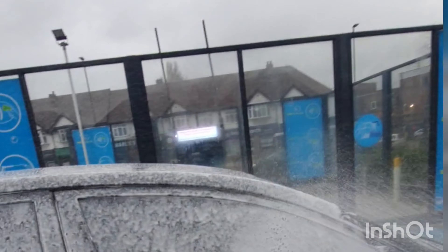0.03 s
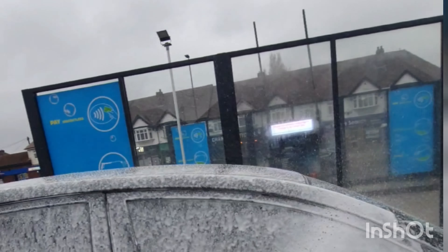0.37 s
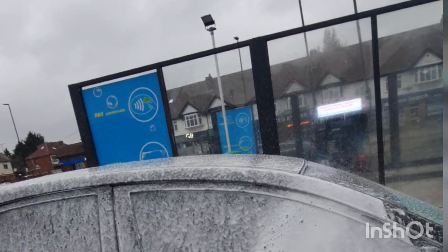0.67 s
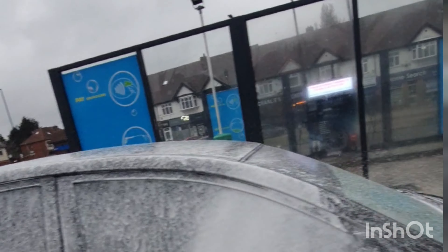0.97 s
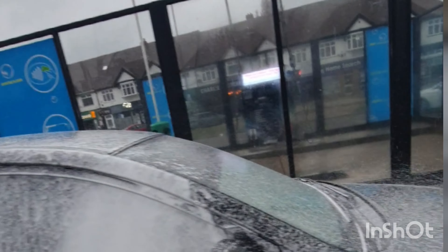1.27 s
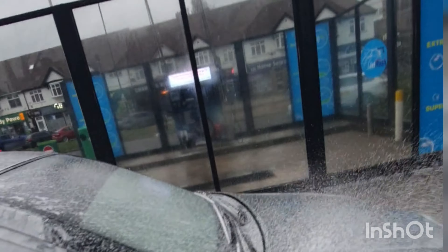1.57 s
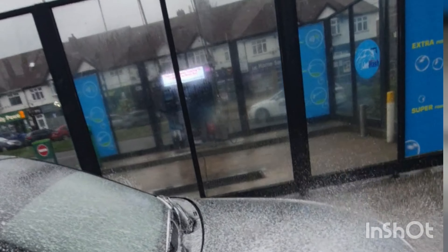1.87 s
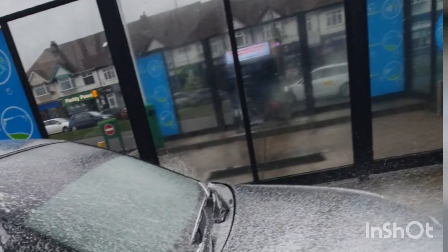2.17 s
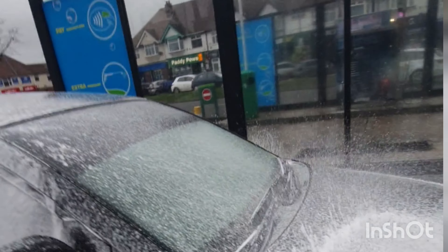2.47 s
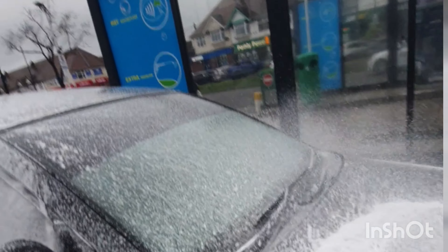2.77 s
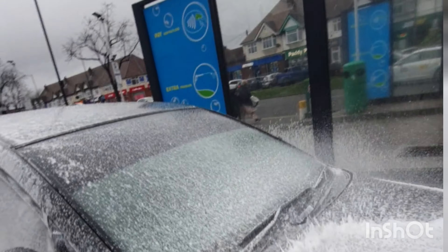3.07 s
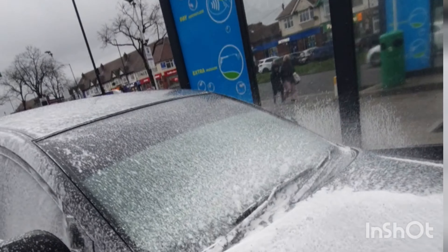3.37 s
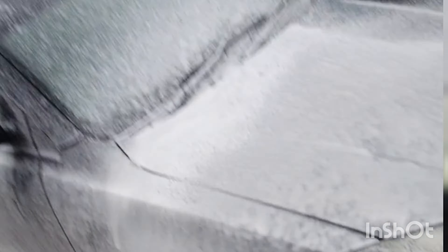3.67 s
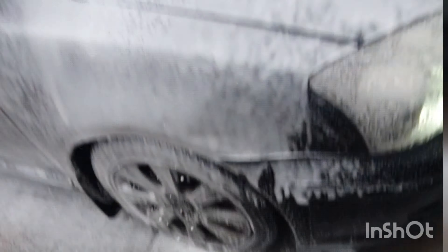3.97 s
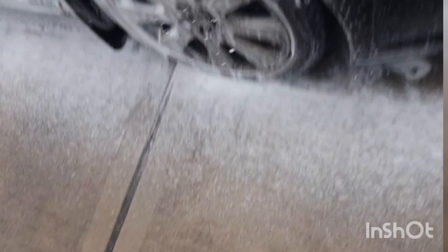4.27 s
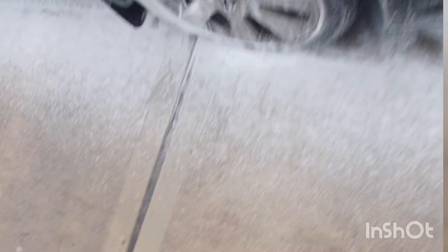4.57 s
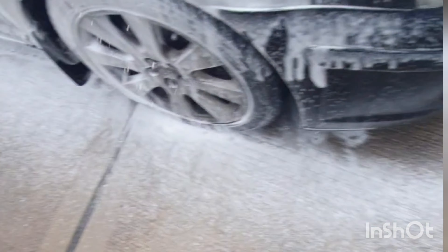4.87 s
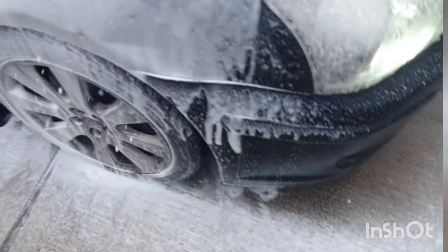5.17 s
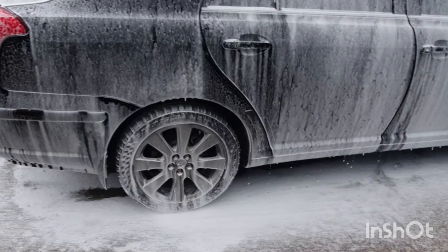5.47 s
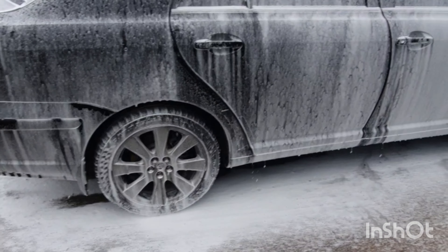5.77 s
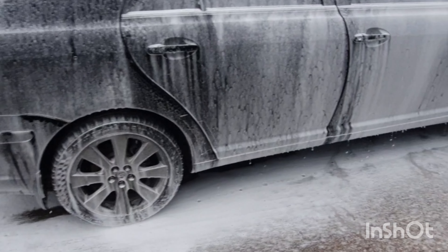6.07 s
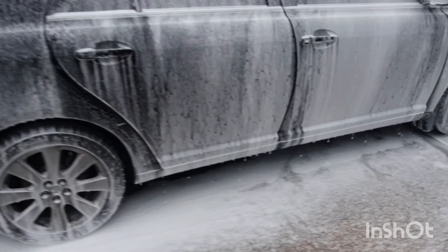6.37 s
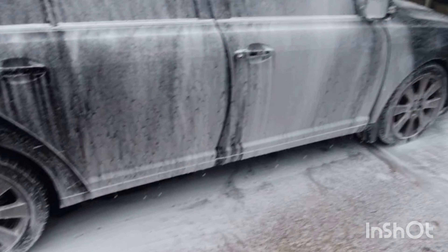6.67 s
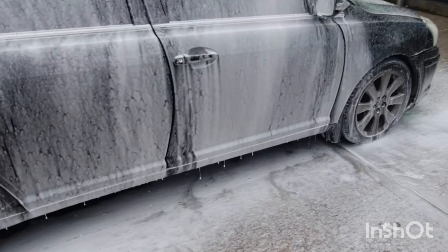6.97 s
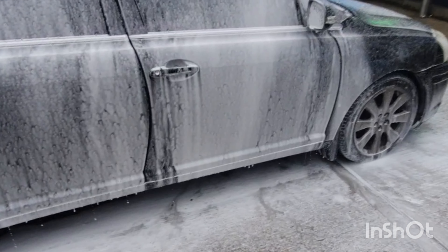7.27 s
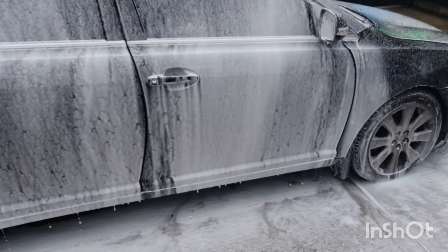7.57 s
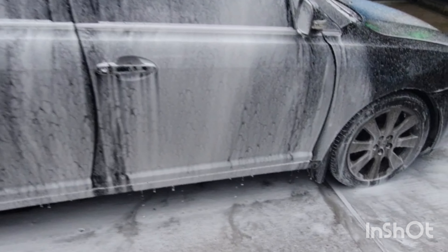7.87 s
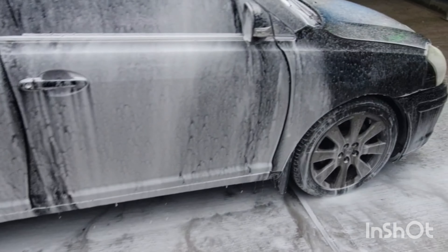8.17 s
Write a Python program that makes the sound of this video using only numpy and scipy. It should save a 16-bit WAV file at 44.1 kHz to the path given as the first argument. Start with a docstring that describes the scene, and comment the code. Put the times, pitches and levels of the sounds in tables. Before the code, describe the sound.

A close jet of spray hisses over a car's panels in an open wash bay while a pump hums. It swings left, buffets the microphone with wind and dull pops, and stops about halfway through. Quiet bubbling and dripping follow, with a ticking idle and a faint wavering whistle. Then street rumble and wet tyre noise grow, a car goes by, and a sharp drip lands.

```python
"""An outdoor car wash bay: a pressure lance sprays a car with hissing drops while its pump hums. The jet swings
to the left, its draught and drops hit the two microphones, and the trigger is let go. Now one hears bubbles
ringing in trickling foam, drips, the ticking of the idling car and a thin whistle. The sound dips for an
instant as the scene changes from the front wheel to the car's side. There, engines and tyres on a wet road grow
louder, and one car passes."""
import sys
import numpy as np
from scipy import signal
from scipy.fft import rfft, irfft, next_fast_len
from scipy.io import wavfile
from scipy.ndimage import map_coordinates

SR = 44100
rng = np.random.default_rng(int(sys.argv[2]) if len(sys.argv) > 2 else 0)


def generate_wav(sig):
    """Save sig (samples, or channels by samples) to the path in sys.argv[1] as 16-bit PCM at SR."""
    pcm = np.round(np.clip(np.atleast_2d(sig).T, -1, 1) * 32767).astype(np.int16)
    wavfile.write(sys.argv[1], SR, pcm)


N = 371322
TIME = np.arange(N) / SR
SIZE = next_fast_len(N, real=True)
HZ = np.maximum(np.arange(SIZE // 2 + 1) * SR / SIZE, 1)
RELEASE_S, JUMP_S = 3.95, 5.3857   # the trigger is let go; the scene changes from the wheel to the car's side


def from_db(db):
    """Turn decibels into a gain, a number to multiply a sound by."""
    return 10 ** (np.asarray(db) / 20)


def pan(db):
    """Gains for two ears that make the left one db louder than the right."""
    return from_db(db * np.array([[.5], [-.5]]))


def rms_one(x):
    """Scale a sound so that its average strength (rms) is 1."""
    return x / np.sqrt(np.mean(x ** 2) + 1e-20)


def in_time(rows):
    """Join a table's points in time, giving each column a value at every sample."""
    s, *columns = np.transpose(rows)
    return np.array([np.interp(TIME, s, c) for c in columns])


def in_hz(rows):
    """Join a table's points in frequency, giving each column a value at every frequency."""
    hz, *columns = np.transpose(rows)
    return np.array([np.interp(np.log(HZ), np.log(hz), c) for c in columns])


def colour(x, gain):
    """Filter a sound: give each frequency its own gain."""
    return irfft(rfft(x, SIZE) * gain, SIZE)[..., :N]


def below(edge_hz, order=4):
    """Gains that keep what is below the edge."""
    return 1 / np.sqrt(1 + (HZ / edge_hz) ** (2 * order))


def above(edge_hz, order=4):
    """Gains that keep what is above the edge."""
    return 1 / np.sqrt(1 + (edge_hz / HZ) ** (2 * order))


def bell(x, centre, width):
    """A rounded bump of height 1."""
    return np.exp(-((x - centre) / width) ** 2)


def ramp(start_s, length_s):
    """An even rise from 0 to 1."""
    return np.clip((TIME - start_s) / length_s, 0, 1)


def after_release(t60):
    """A gain of 1 that falls 60 dB every t60 seconds once the trigger is let go."""
    return from_db(-60 * np.clip((TIME - RELEASE_S) / t60, 0, 3))


def drift(rate_hz, step=40):
    """A slow random wobble, typically 1 in size."""
    count = N // step + 2
    hz = np.arange(count // 2 + 1) * SR / step / count
    slow = irfft(rfft(rng.standard_normal(count)) / np.sqrt(1 + (hz / rate_hz) ** 4), count)
    return np.interp(np.arange(N) / step, np.arange(count), rms_one(slow))


def stereo_noise(gain, likeness):
    """Filtered noise; likeness (0-1) is how much of it both ears share."""
    common = colour(rng.standard_normal(N), gain * np.sqrt(likeness))
    return common + colour(rng.standard_normal((2, N)), gain * np.sqrt(1 - likeness))


def delayed(x, delay_ms, oversample=3):
    """Shift a sound later by a tiny, changing time."""
    fine = signal.resample_poly(x, oversample, 1)
    return map_coordinates(fine, [(TIME - delay_ms / 1000) * SR * oversample], order=1)


def impacts(per_s, spread_db, share):
    """Many tiny hits of uneven size in a smooth rush; share (0-1) is their part of the power."""
    sizes = from_db(spread_db * np.minimum(rng.exponential(1, N), 4)) * rng.choice([-1, 1], N)
    hits = rms_one(sizes * (rng.random(N) < per_s / SR))
    return np.sqrt(share) * hits + np.sqrt(1 - share) * rng.standard_normal(N)


def bodywork_echoes(x, count=2, gain=.16, wander_ms=.05):
    """Weak echoes off the curved car ripple the hiss; their paths wander as the lance moves."""
    paths_ms = (ms + wander_ms * drift(2.7) for ms in rng.uniform(0.673, 2.4, count))
    return x + gain * sum(np.interp(TIME - ms / 1000, TIME, x) for ms in paths_ms)


def close_echo(x, path, gain):
    """An echo off a surface near the microphone, with a gliding delay, turns the hiss into a swish."""
    echo_ms, = in_time(path)
    return x + gain * delayed(colour(x, above(4680, order=2)), echo_ms, oversample=2)


def jet(level_db=-0.88, mist_db=-8, flutter_db=0.53, sway_db=0.51, ahead_db=2.5, db_per_ms=-15):
    """The spray's hiss reaches one ear first; its scatter off car and screens comes from all round."""
    # how hard the jet hits the panels: (time [s], level [dB])
    force = [(0, 3), (.32, 1.4), (.6, 1.5), (.9, -0.53), (1.7, 1), (2.15, 0.36), (2.83, -0.6), (3.02, 0.44),
             (3.4, 1), (3.9, -0.5)]
    # direction of the jet: (time [s], lag of the left ear behind the right [ms])
    bearing = [(.09, 0.033), (.23, 0.17), (.4, 0.19), (.6, 0.26), (.83, .23), (1.2, .225), (1.4, .175),
               (1.6, 0.21), (1.79, 0.26), (2.13, .22), (2.3, .13), (2.55, 0.12), (2.8, 0.028), (3, 0.14),
               (3.2, 0.17), (3.38, .025), (3.58, 0.039), (3.72, -0.12), (3.82, -0.23), (3.92, -.28)]
    # tone of the hiss: (frequency [Hz], left level [dB], right level [dB])
    hiss = [(172.5, -92, -62), (315, -63.5, -59.5), (557, -73, -66), (1200, -67.5, -64), (1430, -62.5, -60),
            (2030, -63.5, -63), (2770, -57, -61), (3620, -55.5, -52.5), (4230, -53.5, -56),
            (6200, -54, -53), (8780, -56, -51.5), (10500, -61, -58), (14000, -63, -54.5),
            (15380, -61.5, -58)]
    # hiss that comes straight from the jet: (frequency [Hz], share [0-1])
    direct_share = [(150, .4), (600, .52), (1500, .6), (2250, .96), (3400, 1), (5200, .7), (7300, .46),
                    (9300, .27), (14000, .45)]
    # middle of the hiss, under its bright top: (time [s], left boost [dB], right boost [dB])
    middle_boost = [(0, -1.5, 1), (.55, -2.5, 1.9), (1, -1.5, -0.5), (1.55, -3.5, -1), (2.15, -1.5, 0.5),
                    (2.5, -3, 0.6), (2.8, .5, 0.5), (3.1, 1, 1.5), (3.4, -0.3, 1.5), (3.72, 2, 4),
                    (3.92, 0.5, 3.5)]
    # echoes off surfaces near each microphone: (time [s], delay [ms])
    left_echo = [(0, .75), (.56, .7), (.67, .55), (1.23, .51), (1.93, .5), (2.16, .66), (2.62, .71),
                 (2.72, .61), (3.18, .57), (3.44, .67), (3.67, .55)]
    right_echo = [(0, .43), (.2, .53), (.55, .5), (1.37, .37), (1.7, .38), (2.04, .44), (2.46, .455),
                  (2.7, .5), (3.15, .75), (3.4, .62), (3.8, .47)]
    force_db, = in_time(force)
    lag_ms, = in_time(bearing)
    source, *around = (bodywork_echoes(impacts(14000, spread_db=3, share=0.33)) for _ in range(3))
    share = in_hz(direct_share)
    tone = from_db(in_hz(hiss)) * np.sqrt(SR / 2)
    ears = np.array([delayed(source, lag_ms / 2), delayed(source, -lag_ms / 2)])
    direct = colour(ears, tone * np.sqrt(share))
    scatter = colour(np.array(around), tone * np.sqrt(1 - share))
    # the valve shuts quickly; water still in the air lands a little later
    valve = after_release(t60=0.053)
    mist = from_db(mist_db) * after_release(t60=0.222)
    spray = direct * valve + scatter * np.maximum(valve, mist)
    middle = colour(spray, below(4500) * above(706.5, order=2))
    spray = colour(spray, above(50)) + middle * (from_db(in_time(middle_boost)) - 1)
    left = close_echo(spray[0], left_echo, gain=.15)
    right = close_echo(spray[1], right_echo, gain=.27)
    gain = from_db(level_db + force_db + flutter_db * drift(26) + sway_db * drift(5))
    return np.array([left, hollow(right)]) * pan(ahead_db + db_per_ms * lag_ms) * gain


def hollow(x, wander_hz=60, width_hz=400, third_width_hz=650):
    """Air in a hollow rings at one pitch and at three times that pitch; both rise as it narrows."""
    # a hollow, probably a hand, by the right microphone: (time [s], pitch [Hz], boost [dB])
    resonance = [(2.04, 3670, -1), (2.24, 3570, 5), (2.8, 3920, 5.5), (3.3, 3950, 4), (3.68, 4320, 5),
                 (3.83, 6050, 4.5)]
    hz, s, frames = signal.stft(x, SR, nperseg=512)
    pitch, boost_db = in_time(resonance)
    centre = np.interp(s, TIME, pitch + wander_hz * drift(2.5))
    lift = bell(hz[:, None], centre, width_hz) + bell(hz[:, None], 3 * centre, third_width_hz)
    boosted = frames * from_db(np.interp(s, TIME, boost_db) * lift)
    return signal.istft(boosted, SR, nperseg=512)[1][:N]


def pump(loaded_hz=72.85, idle_hz=76.5, hum_db=-38, waver_db=.9, idle_drop_db=13.5, rumble_db=-45):
    """Piston strokes hum and whine through the hose; freed of the jet, they run faster and quieter."""
    # tones of the hum: (multiple of the stroke rate, relative level [dB])
    hum_tones = [(1, 1), (2, -13.5), (3, -10.5), (4.34, -13.5)]
    # the whine at six times the stroke rate: (time [s], relative level [dB])
    whine_level = [(1.2, -53.5), (1.7, -44.5), (2.4, -57.5), (2.8, -41.5), (3.85, -43), (4.02, -48.5),
                   (4.2, -59)]
    whine_db, = in_time(whine_level)
    idle = ramp(start_s=4.15, length_s=0.159)
    stroke_hz = loaded_hz + (idle_hz - loaded_hz) * idle
    phase = 2 * np.pi * np.cumsum(stroke_hz * (1 + 0.0017 * drift(3.7))) / SR
    hum = sum(from_db(db + waver_db * drift(5)) * np.sin(k * phase + rng.uniform(0, 2 * np.pi))
              for k, db in hum_tones)
    whine = from_db(whine_db + 0.5) * np.sin(6 * phase)
    tones = np.sqrt(2) * (from_db(hum_db) * hum + whine) * from_db(-idle_drop_db * idle)
    rumble = from_db(rumble_db) * rms_one(stereo_noise(above(48) * below(105, order=2), likeness=0.36))
    return (tones + rumble * after_release(t60=1.7)) * pan(-2) * (TIME < JUMP_S)


def gusts(lowest_hz=55, lumps_db=2, rise_s=0.0073, fall_s=0.014):
    """Swirling air buffets each microphone separately with a low, lumpy rumble."""
    # puffs of wind: (time [s], length [s], level [dB], upper edge [Hz], left over right [dB])
    puffs = [(3.57, 0.15, -33, 100, 1), (3.728, 0.12, -22.5, 85, 13), (3.747, .205, -28.5, 367, 6.5),
             (3.862, .1, -19.5, 96.3, 10), (3.96, .32, -32.5, 102, -6), (4.024, .04, -29.5, 160, -5),
             (4.13, .15, -41.5, 297, -8), (4.406, 0.042, -38.5, 115, 17), (4.555, 0.093, -42.5, 190, 3),
             (4.701, 0.071, -45, 190, 5), (4.85, .035, -43, 169.3, 4), (4.966, .06, -42, 260, 3),
             (5.246, 0.11, -33.5, 127, 5.5)]
    out = np.zeros((2, N))
    lumps = from_db(lumps_db * drift(18))
    for s, length, db, edge_hz, pan_db in puffs:
        start, count = int(s * SR), int(length * SR)
        age = TIME[:count]
        fade = np.clip(np.minimum(age / rise_s, (length - age) / fall_s), 0, 1)
        band = signal.butter(2, [lowest_hz, edge_hz], "band", fs=SR, output="sos")
        swirls = signal.sosfilt(band, rng.standard_normal((2, SR)))[:, -count:]
        rounded = np.tanh(rms_one(swirls * lumps[start:start + count]) / 2)
        out[:, start:start + count] += rms_one(rounded * fade) * from_db(db) * pan(pan_db)
    return out


def drop_strikes(lowest_hz=150):
    """A drop that hits a microphone gives a short dull pop; the bigger ones thump."""
    # the drops: (time [s], peak level [dB], left over right [dB], upper edge [Hz])
    drops = [(3.833, -28, 7.5, 700), (3.856, -15, 16, 1060), (3.873, -27, 18, 890), (3.909, -27, 12, 500),
             (3.924, -16.5, 19, 450), (3.947, -18.5, 14, 547), (4.143, -29, -13, 340)]
    out, click = np.zeros((2, N)), signal.unit_impulse(SR // 20)
    for s, db, pan_db, edge_hz in drops:
        band = signal.butter(2, [lowest_hz, edge_hz], "band", fs=SR, output="sos")
        pop = signal.sosfilt(band, click)
        start = int(s * SR)
        out[:, start:start + len(pop)] += from_db(db) * pan(pan_db) * pop / pop.max()
    return out


def settling_spray(level_db=-48, band_hz=(400, 3500)):
    """Spray settles on car and ground in a soft wash that lingers after the jet stops."""
    band = signal.butter(1, band_hz, "band", fs=SR, output="sos")
    wash = rms_one(signal.sosfilt(np.vstack([band, band]), rng.standard_normal((2, N))))
    return from_db(level_db) * wash * after_release(t60=1.45)


def foam(per_s=170, t60=.028, rise_per_s=.7, spread_db=2.8, pan_spread_db=5, patter_db=-7.5):
    """Foam trickles off the car: each bubble rings briefly, rising a little; fine drops patter."""
    # kinds of bubble, per_s of each a second: (pitch [Hz], pitch spread [Hz], relative level [dB])
    bubble_kinds = [(1500, 70, 0), (1900, 150, .5), (3850, 220, -4.5), (4450, 130, -5.5)]
    # how much foam comes down: (time [s], level [dB])
    flow = [(4, -54), (4.26, -57), (4.33, -64), (4.42, -61), (4.62, -59), (4.85, -60), (5.1, -59),
            (5.16, -64), (5.23, -56), (5.38, -54)]
    level_db, = in_time(flow)
    out, age = np.zeros((2, N)), TIME[:int(t60 * SR)]
    length = JUMP_S - RELEASE_S
    count = int(per_s * length)
    decay = from_db(-60 * age / t60)
    for hz, spread_hz, db in bubble_kinds:
        times = rng.uniform(RELEASE_S, JUMP_S, count)
        for s, (pitch, size, side, lag) in zip(times, rng.standard_normal((count, 4))):
            phase = 2 * np.pi * (hz + spread_hz * pitch) * age * (1 + rise_per_s * age / 2)
            ring = decay * np.sin([phase, phase + lag])
            gain = from_db(db + spread_db * min(size, 2)) * pan(pan_spread_db * side)
            start = int(s * SR)
            out[:, start:start + len(age)] += ring * gain
    bubbles = rms_one(out) * np.sqrt(length / TIME[-1])   # strength 1 while the foam runs
    drops = np.array([impacts(per_s=280, spread_db=1, share=0.8) for ear in range(2)])
    patter = from_db(patter_db + 2.4 * drift(14)) * rms_one(colour(drops, bell(HZ, 2500, 11400)))
    return from_db(level_db) * (bubbles + patter) * (TIME > RELEASE_S) * (TIME < JUMP_S)


def drips(t60=.025, small_per_s=8, small_db=-50, small_hz=3900):
    """Water drops off the car in short splats: soft ones from the wheel arch, then a few louder ones."""
    # the louder drips: (time [s], peak level [dB], pitch [Hz])
    loud = [(5.611, -48, 13050), (6.766, -43, 13030), (8.336, -26, 13000), (8.359, -34, 12000)]
    out, age = np.zeros((2, N)), TIME[:SR // 20]
    length = JUMP_S - RELEASE_S
    small = [(RELEASE_S + when * length, small_db, small_hz * (.9 + .2 * pitch))
             for when, pitch in rng.random((int(small_per_s * length), 2))]
    for s, db, hz in loud + small:
        start = int(s * SR)
        burst = rng.standard_normal((2, len(age))) * from_db(-60 * age / t60)
        splat = signal.lfilter(*signal.iirpeak(hz, Q=2.5, fs=SR), burst)[:, :N - start]
        out[:, start:start + splat.shape[1]] += from_db(db) * splat / np.abs(splat).max()
    return out


def street_levels(sheltered_db=(-47.5, -55, -62), open_db=(-35.5, -42.5, -57), swell_start_s=5.974):
    """Base levels of rumble, roar and wet hiss [dB]: low by the wheel, higher in the open."""
    # how much each band of the background swells shortly after the jump, probably as the
    # recorder's gain comes back up: (rise [dB], rise time [s])
    swells = [(9, 0.83), (9.1, 0.59), (12.34, 0.83)]
    return [np.where(TIME < JUMP_S, low, high) + rise_db * ramp(swell_start_s, rise_s)
            for low, high, (rise_db, rise_s) in zip(sheltered_db, open_db, swells)]


def traffic(low_edge_hz=380, high_edge_hz=2800):
    """Engines rumble unevenly; tyres roar and hiss on the wet road."""
    # tone of the street: (frequency [Hz], left level [dB], right level [dB])
    street = [(20.1, -81.5, -74.5), (56, -49.5, -50), (110, -51.5, -47.5), (166, -58.5, -57.5),
              (299, -58, -53), (388, -61, -59), (626, -64, -59.5), (930, -62.5, -59.5),
              (2340, -71.5, -69.5), (2870, -78.5, -77), (3800, -79, -78.5), (6430, -86.5, -88.5),
              (10350, -97, -94.5), (15920, -99.5, -94.5)]
    # how alike the street sounds at both ears: (frequency [Hz], likeness [0-1])
    likeness = [(60, 0.9), (300, 0.98), (900, 0.36), (2000, 0.18), (5000, 0.046)]
    # one engine droning among the rest: (frequency [Hz], width [Hz], boost [dB])
    drone = [(126, 3.9, 9.5), (307.5, 11, 4.5)]
    rumble_db, roar_db, wet_db = street_levels()
    tone = from_db(in_hz(street) + sum(db * bell(HZ, hz, width) for hz, width, db in drone))
    parts = [(below(low_edge_hz), rumble_db - 0.6 + 1.5 * drift(9.6)),
             (above(low_edge_hz) * below(high_edge_hz), roar_db + 0.83),
             (above(high_edge_hz), wet_db + 0.6 + 1.6 * drift(27.4))]
    return sum(from_db(db) * rms_one(stereo_noise(tone * band, in_hz(likeness))) for band, db in parts)


def idling_engine(firings_per_s=26.75, firing_at_s=7.406, attack_s=0.0066, t60=.18, relative_db=-3.5):
    """Each firing of the car's four cylinders brings a short burst of bright clatter."""
    # the cylinders in firing order: (relative level [dB])
    cylinders = [0, -1.2, .8, -.5]
    # tone of the clatter: (frequency [Hz], relative level [dB])
    tone = [(1200, 0), (3300, -13.5), (4600, -7), (6500, -15), (9000, -14.5), (12000, -19.5), (15000, -15)]
    firings = (TIME - firing_at_s) * firings_per_s
    age = firings % 1 / firings_per_s
    cylinder_db = np.array(cylinders)[np.floor(firings).astype(int) % len(cylinders)]
    beat = np.minimum(age / attack_s, 1) * from_db(cylinder_db - 60 * age / t60)
    grains = np.array([impacts(per_s=3300, spread_db=2.5, share=0.56) for ear in range(2)])
    clatter = rms_one(colour(grains * beat, from_db(in_hz(tone)) * above(700)))
    return clatter * from_db(street_levels()[-1] + relative_db)   # swells along with the wet hiss


def whistle(wander_hz=40, flutter_db=4.5, flutter_hz=22):
    """A thin whistle near the car: close tones waver and flicker, differently at each ear."""
    # its tones: (pitch [Hz], relative level [dB])
    tones = [(4360, -7), (4590, -6), (4740, -5)]
    # how loud it is: (time [s], level [dB])
    loudness = [(4.1, -71.5), (5.33, -80), (5.5, -74), (6.2, -62), (7.2, -56), (7.7, -51), (8.4, -52)]
    out = np.zeros((2, N))
    for hz, db in tones:
        phase = 2 * np.pi * np.cumsum(hz + wander_hz * drift(16)) / SR
        ears = np.sin([phase, phase + drift(flutter_hz)])
        flicker = from_db(flutter_db * np.minimum(drift(flutter_hz), 1.5))
        out += from_db(db) * rms_one(ears * flicker)
    return out * from_db(in_time(loudness)) * pan(-4.5)


def passing_car(at_s=6.87, width_s=0.45, level_db=-39.5, pitch_hz=980, width_hz=220):
    """The tyres of one car sing in a narrow band that swells and fades as it passes."""
    tyres = rms_one(stereo_noise(bell(HZ, pitch_hz, width_hz), likeness=.5))
    return tyres * from_db(level_db) * pan(-3) * bell(TIME, at_s, width_s)


def scene():
    """The washing, plus the background that comes through once the jet stops."""
    washing = jet() + pump() + gusts() + drop_strikes() + settling_spray() + foam() + drips()
    return washing + traffic() + idling_engine() + whistle() + passing_car()


def record(dry, notch_hz=9750, notch_width_hz=620, notch_db=-7, dip_s=.01, cutoff_hz=15850):
    """The microphone openings scoop out some treble; the level dips as the scene changes; the top is cut."""
    openings = from_db(notch_db * bell(HZ, notch_hz, notch_width_hz))
    dip = np.interp(TIME - JUMP_S + dip_s / 2, [-.001, 0, dip_s, dip_s + .004], [1, .04, .1, 1])
    top_cut = np.clip((cutoff_hz - HZ) / 150 + .5, 0, 1)
    return colour(dry * dip, openings * top_cut)


dry = scene()
out = record(dry)
generate_wav(out)
```